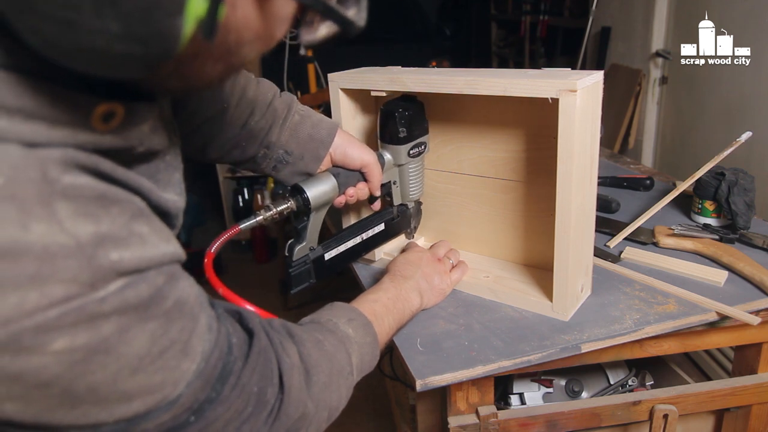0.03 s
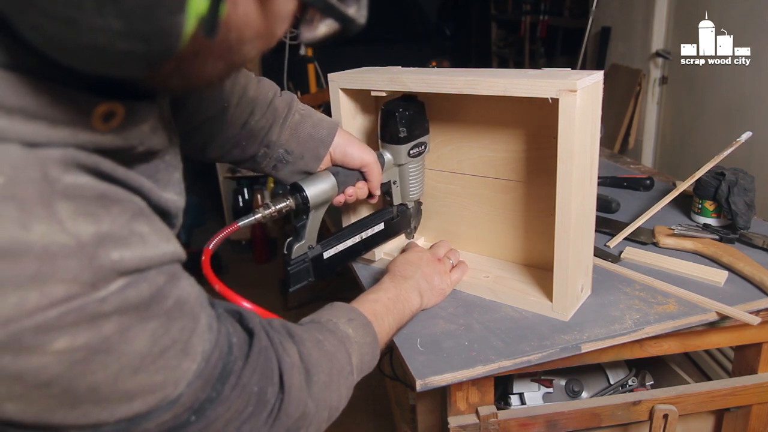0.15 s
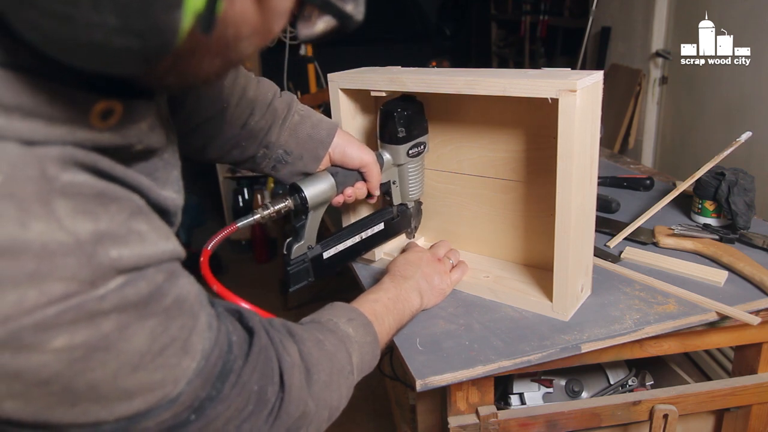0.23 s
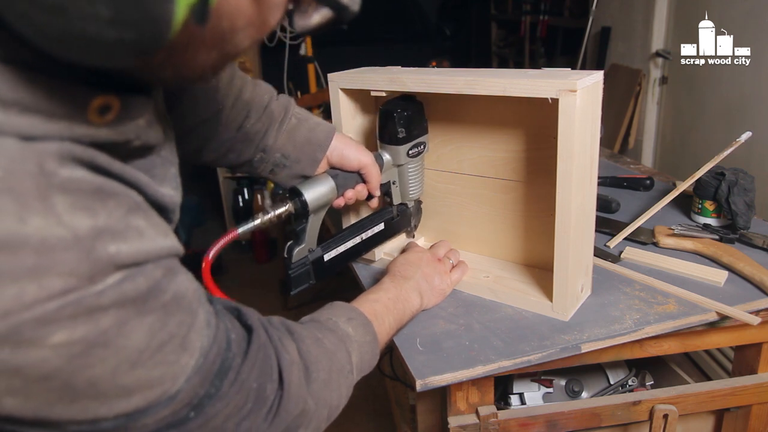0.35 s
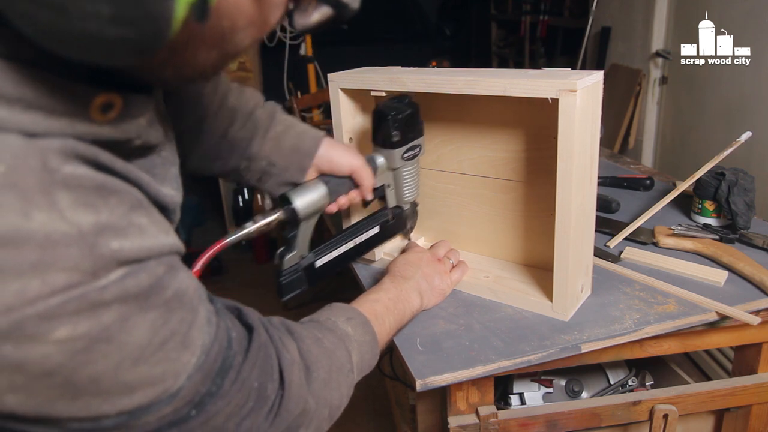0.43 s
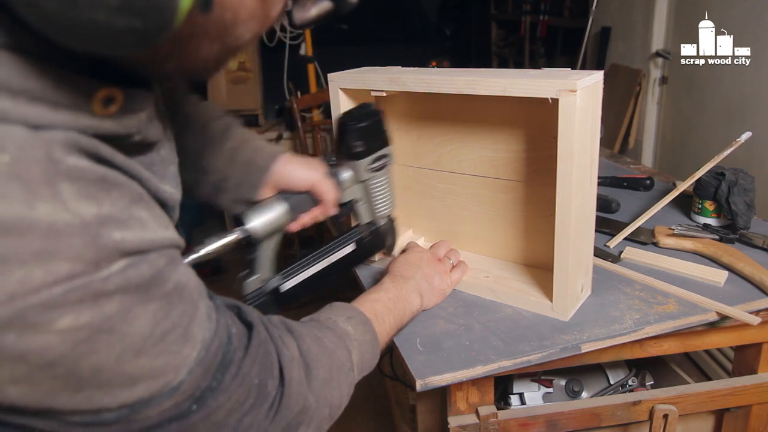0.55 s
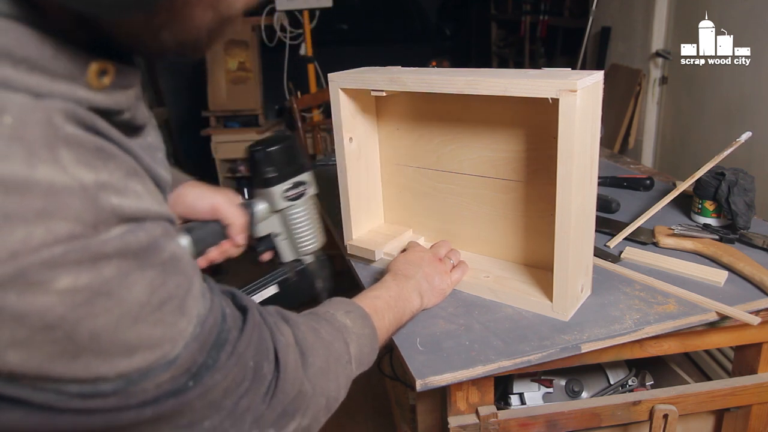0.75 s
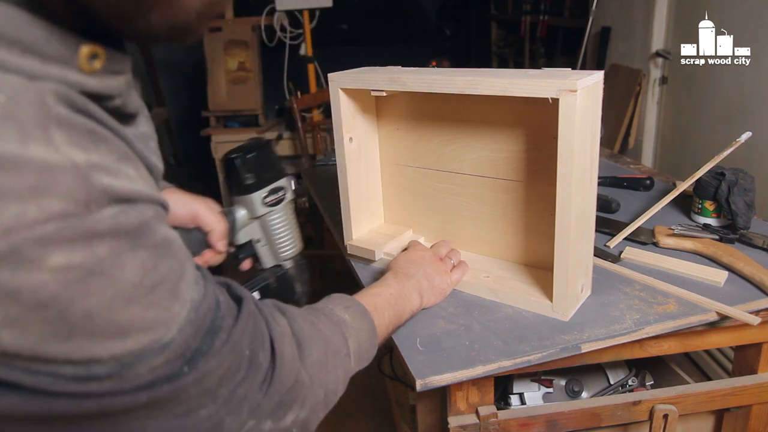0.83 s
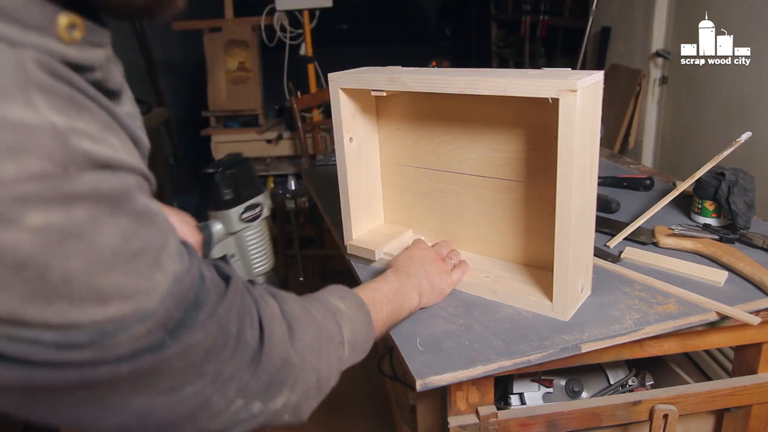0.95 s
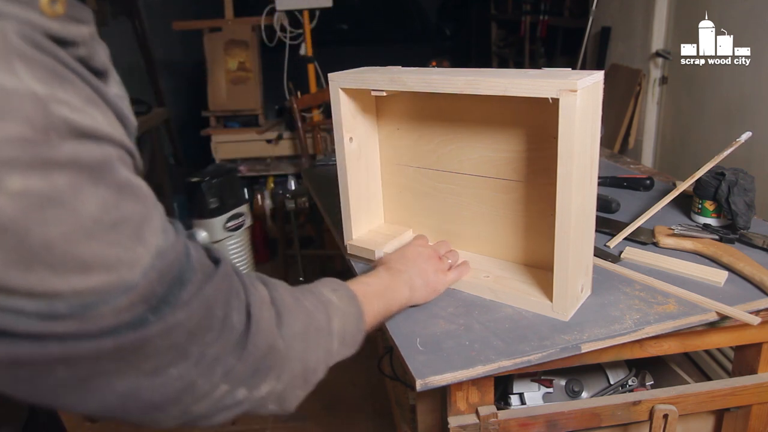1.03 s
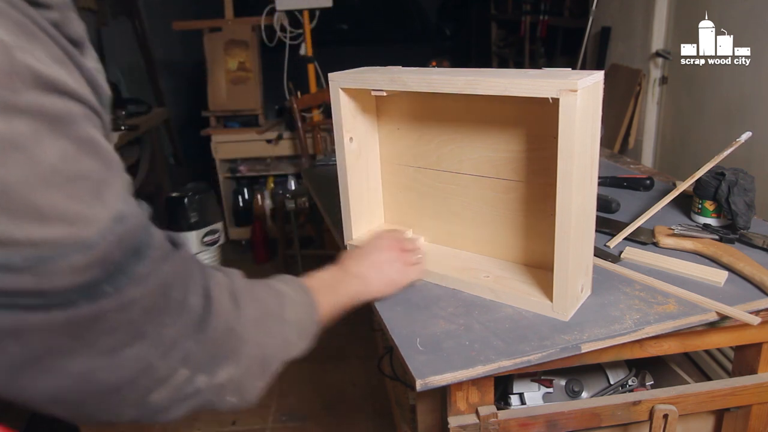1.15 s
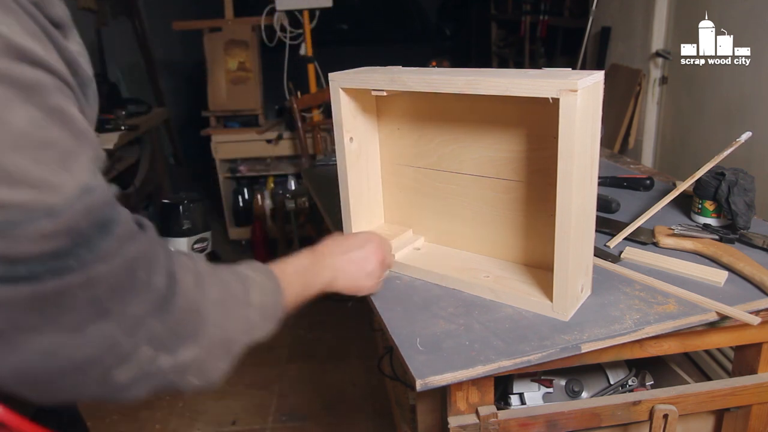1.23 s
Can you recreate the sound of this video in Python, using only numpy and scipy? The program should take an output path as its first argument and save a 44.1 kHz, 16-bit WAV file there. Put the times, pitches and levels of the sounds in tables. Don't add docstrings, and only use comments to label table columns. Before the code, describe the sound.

A pneumatic nailer fires once into a wooden box in a quiet workshop. Faint settling taps at 0.2 seconds, then a valve thud and air rush at 0.24, and a violent, clipped crack at 0.28 with a ringing hall tail. Hose and sleeve rub softly; the trigger ticks and pings at 0.48, the nose clicks away at 0.63. Wood clicks at 1.07, then shuffles and knocks near 1.24.

```python
import sys
import numpy as np
from scipy import signal
from scipy.fft import rfft, irfft
from scipy.io import wavfile
from scipy.ndimage import uniform_filter1d

SR = 44100
rng = np.random.default_rng(int(sys.argv[2]) if len(sys.argv) > 2 else 0)


def transcribe(signal):
    frames = np.atleast_2d(signal).T
    limited = np.clip(frames, -1, 1)
    pcm = np.round(limited * 32767).astype(np.int16)
    wavfile.write(sys.argv[1], SR, pcm)


def how_loud(loudness_db):
    steps = np.asarray(loudness_db, float) / 20
    return 10 ** steps


N = 57330

# f/Hz, density/dB
ROOM_TONE = [(20, -4), (146, -1), (300, -3), (550, -7), (3000, -15), (9800, -24), (12500, -38),
             (16000, -58.5)]
ROOM_TONE_DB = -63.5
# t/s, level/dB
DRONE_SWELL = [(0, -59), (.45, -63.5), (.62, -57), (.69, -51.5), (.77, -54.5), (.9, -72), (1.3, -63)]
# f/Hz, width/Hz, level/dB
DRONE_LINES = [(66, 15, -11.5), (147.2, 3.3, -9)]
# f/Hz, T60/s
NEAR_T60 = [(100, 0.065), (400, .25), (1000, 0.1), (4000, 0.33), (12000, 0.079)]
# f/Hz, T60/s
HALL_T60 = [(100, 0.247), (400, 0.9), (1000, 1.65), (4000, 1.8), (12000, 0.65)]
NEAR_DB, HALL_DB, SEND_HZ = -21, -27.5, 267

# t/s, level/dB
HOSE_RUB = [(.3, -32.5), (.36, -45.5), (.45, -52.5), (.6, -51), (.68, -51.5), (.76, -59.5), (.9, -71),
            (1.04, -82.5)]
# f/Hz, density/dB
HOSE_COLOUR = [(60, -19.5), (150, -11.5), (600, -9.5), (1100, -5), (2500, -14.5), (5000, -15.5),
               (9000, -27), (13000, -47.5)]
# t/s, level/dB
STRIP_SHUFFLE = [(.8, -79), (1.04, -69), (1.075, -58.5), (1.14, -58), (1.18, -62.5), (1.22, -52),
                 (1.26, -54), (1.3, -56)]
# f/Hz, density/dB
STRIP_COLOUR = [(59, -37.5), (100, 3.5), (328, 1), (1910, -2), (2580, 0.5), (3250, -4), (8830, -3),
                (14400, -27), (16000, -53)]
GRAINS_PER_S, GRAIN_SPREAD_DB, GRAIN_SHARE = 4000, 1.5, .6

# t/s, metal level/dB, wood level/dB, snap level/dB
NOSE_CLICKS = [
    (.1875, -57, -62, -64.5),
    (0.6292, -34, -52, -42),
    (1.0662, -43.5, -45, -49),
    (1.2141, -51, -86, -57),
    (1.2422, -64, -46, -47),
    (1.288, -77, -64, -66),
]
# f/Hz, level/dB
NOSE_MODES = [(2300, -1), (2750, -3), (4380, 0)]
# f/Hz, level/dB
STRIP_MODES = [(820, 0), (1000, -2), (1390, -2)]
NOSE_T60 = .022
SNAP_HZ, SNAP_T60 = (700, 10000), .016  # band, s
# t/s, level/dB, f/Hz, T60/s
WOOD_KNOCKS = [
    (0.198, -53, 260, 0.1),
    (0.208, -49, 230, .06),
    (0.575, -46.5, 347, .1),
    (1.2419, -37, 444, 0.019),
    (1.262, -47.5, 585, 0.083),
    (1.285, -48, 499, 0.064),
]
# t/s, then modes as f/Hz, level/dB, T60/s
STRIP_CATCH = (1, [(2530, -47, .06), (2650, -53, .05)])

# f/Hz, level/dB, T60/s
SPRING = [(6455, -7, .3), (6480, -11, .2), (8900, -2, .014), (12460, -11, .3), (12500, -13, .28)]
RESET_S, SPRING_DB = .4797, -43.5
PUFF_DB, PUFF_T60, PUFF_HZ, TICK_DB = -41, 0.083, 5000, -36

# t/s, level/dB
VENT_PRESSURE = [
    (.2365, -38),
    (.2375, -53),
    (.2403, -24.5),
    (.2418, -14.5),
    (.25, -21),
    (.265, -25.5),
    (.278, -21.5),
    (.292, -16.5),
    (.32, -64),
]
# f/Hz, density/dB
VENT_COLOUR = [(59, -55), (100, -4.5), (634, -28.5), (2170, -0.5), (2860, -11.5), (3250, -23.5), (9210, 3),
               (14700, -12), (16000, -5)]
# f/Hz, width/Hz, level/dB
VENT_PIPES = [(2750, 190, -4.5), (3840, 360, 0), (6800, 1400, 5.5), (9000, 930, 2)]
FLUTTER_DB = 1.2
# f/Hz, level/dB, T60/s
VALVE_THUD = [(185, -31.5, 0.037), (290, -46.5, 0.13)]

# t/s, box level/dB, best struck f/Hz, crack level/dB, crack T60/s
BLOWS = [
    (.2798, 3.5, 1330, -30, .02),
    (.2824, 1.5, 2500, -30, .02),
    (.2840, -3, 950, -3, .013),
    (.2955, -19, 1700, -22, .04),
]
# f/Hz, level/dB
BOX_MODES = [(300, 7), (520, -0.5), (765, -3.5), (942, -2.5), (1150, -2.5), (1300, -3), (1440, -4),
             (1690, -2.5), (2000, -6), (2300, -4), (2550, 2), (3050, -1), (4420, 2.5), (5300, 9.5)]
# low f/Hz, high f/Hz, level/dB, T60/s
PANELS = [(63, 990, -33.5, 0.21), (356, 1200, -18, 0.054), (1900, 18000, -29, 0.16)]
FOCUS_DB = -14
WOOD_CYCLES, WOOD_S = 16.8, 0.0048
PUSH_DB, PUSH_S = -14, .0008
CRACK_HZ = (5000, 16500)

MIC_HZ, CLIP = 12000, .335


def evened(x):
    return x / np.sqrt(np.mean(x ** 2) + 1e-20)


def hiss():
    return rng.standard_normal(N)


def read(points, hz):
    f, value = np.transpose(points)
    return np.interp(np.log(hz + 1), np.log(f + 1), value)


def level(curve):
    s, db = np.transpose(curve)
    return how_loud(np.interp(np.arange(N) / SR, s, db, -150, -150))


def coloured(x, spectrum):
    gain = how_loud(read(spectrum, np.fft.rfftfreq(N, 1 / SR)))
    return evened(irfft(rfft(x) * gain, N))


def resonate(x, hz, width):
    turn = np.exp(2j * np.pi * hz * np.arange(len(x)) / SR)
    r = np.exp(-np.pi * width / SR)
    return 2 * (turn * signal.lfilter([1 - r], [1, -r], x / turn)).real


def since(s):
    t = np.arange(N) / SR - s
    return np.maximum(t, 0), t >= 0


def ring(s, modes, rise_s=0.00082):
    t, on = since(s)
    tones = sum(how_loud(db - 60 * t / t60) * np.cos(2 * np.pi * hz * t) for hz, db, t60 in modes)
    return on * (1 - np.exp(-t / rise_s)) * tones


def burst(s, t60, low_hz, high_hz=13000):
    t, on = since(s)
    band = signal.butter(2, [low_hz, high_hz], "band", fs=SR)
    rise = 1 - np.exp(-t / .0006)
    return on * rise * how_loud(-60 * t / t60) * evened(signal.lfilter(*band, hiss()))


def shop():
    drone = 0
    for hz, width, db in DRONE_LINES:
        hum = resonate(resonate(hiss(), hz, width), hz, width)
        drone = drone + how_loud(db) * evened(hum)
    return how_loud(ROOM_TONE_DB) * coloured(hiss(), ROOM_TONE) + level(DRONE_SWELL) * drone


def room(x, decay, gap_s):
    taps = np.zeros(N)
    at = np.arange(0, N - 20, 20) + rng.integers(0, 20, (N - 1) // 20)
    taps[at] = rng.choice([-1., 1.], at.shape) * (at > gap_s * SR)
    hz, t, z = signal.stft(taps, SR, nperseg=256)
    fade = how_loud(-60 * t / read(decay, hz)[:, None])
    tail = signal.istft(z * fade, SR, nperseg=256)[1]
    return signal.fftconvolve(x, tail / np.linalg.norm(tail))[:N]


def rubbing(curve, colour):
    hits = rng.random(N) < GRAINS_PER_S / SR
    strength = how_loud(GRAIN_SPREAD_DB * np.minimum(rng.exponential(1, N), 4))
    grains = hits * hiss() * strength
    return level(curve) * coloured(GRAIN_SHARE * evened(grains) + hiss(), colour)


def handling():
    out = np.zeros(N)
    for s, metal_db, wood_db, snap_db in NOSE_CLICKS:
        metal = [(hz, metal_db + db, NOSE_T60) for hz, db in NOSE_MODES]
        wood = [(hz, wood_db + db, NOSE_T60 * 1.5) for hz, db in STRIP_MODES]
        out = out + ring(s, metal + wood, rise_s=0.00085)
        out = out + how_loud(snap_db) * burst(s, SNAP_T60, *SNAP_HZ)
    for s, db, hz, t60 in WOOD_KNOCKS:
        out = out + ring(s, [(hz, db, t60), (hz * 1.17, db - 3.5, t60)], rise_s=0.0013)
    return out + ring(*STRIP_CATCH, rise_s=0.0035)


def trigger():
    puff = how_loud(PUFF_DB) * burst(RESET_S, PUFF_T60, PUFF_HZ)
    tick = how_loud(TICK_DB) * burst(RESET_S, 0.0086, 6300)
    return how_loud(SPRING_DB) * ring(RESET_S, SPRING) + puff + tick


def vent():
    air = coloured(hiss(), VENT_COLOUR)
    pipes = sum(how_loud(db) * evened(resonate(hiss(), hz, width)) for hz, width, db in VENT_PIPES)
    flutter = evened(uniform_filter1d(hiss(), size=60))
    return level(VENT_PRESSURE) * evened(air + pipes) * how_loud(FLUTTER_DB * flutter)


def valve():
    opens_s = VENT_PRESSURE[2][0]
    return ring(opens_s, VALVE_THUD, rise_s=.002)


def driver():
    hit_s = BLOWS[0][0]
    t = np.arange(N) / SR - hit_s
    speed = np.where(t < 0, 1, 4.0)
    out = how_loud(PUSH_DB) * np.exp(-abs(t) / PUSH_S * speed)
    for low, high, db, t60 in PANELS:
        out = out + how_loud(db) * burst(hit_s, t60, low, high)
    for s, box_db, best_hz, crack_db, crack_t60 in BLOWS:
        struck = []
        for hz, db in BOX_MODES:
            focus = FOCUS_DB * np.log2(hz / best_hz) ** 2
            struck.append((hz, db + focus, WOOD_CYCLES / hz + WOOD_S))
        out = out + how_loud(box_db) * ring(s, struck)
        out = out + how_loud(crack_db) * burst(s - .0005, crack_t60, *CRACK_HZ)
    return out


def scene():
    near = handling() + trigger() + vent() + valve() + driver()
    send = signal.lfilter(*signal.butter(2, SEND_HZ, "high", fs=SR), near)
    wet = how_loud(NEAR_DB) * room(send, NEAR_T60, .004) + how_loud(HALL_DB) * room(send, HALL_T60, 0.0067)
    friction = rubbing(HOSE_RUB, HOSE_COLOUR) + rubbing(STRIP_SHUFFLE, STRIP_COLOUR)
    return (shop() + wet + friction + near)[None]


def top_cut(x):
    return signal.sosfilt(signal.butter(12, 16250, fs=SR, output="sos"), x)


def record(dry):
    dull = signal.lfilter(*signal.butter(2, MIC_HZ, fs=SR), dry)
    clipped = dull / (1 + abs(dull / CLIP) ** 4.0) ** (1 / 4.0)
    mix = signal.lfilter(*signal.butter(4, 15000, fs=SR), clipped)
    return top_cut(mix)


dry = scene()
out = record(dry)
transcribe(out)
```